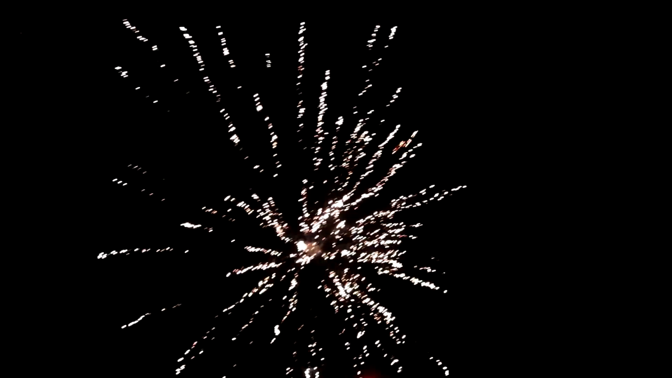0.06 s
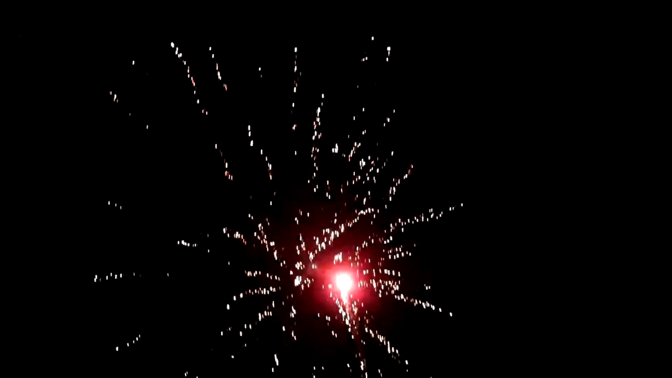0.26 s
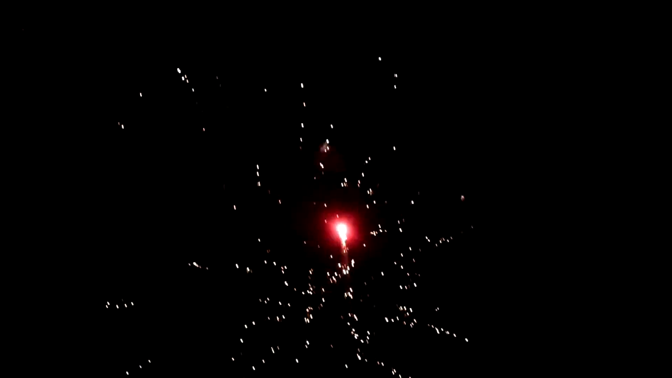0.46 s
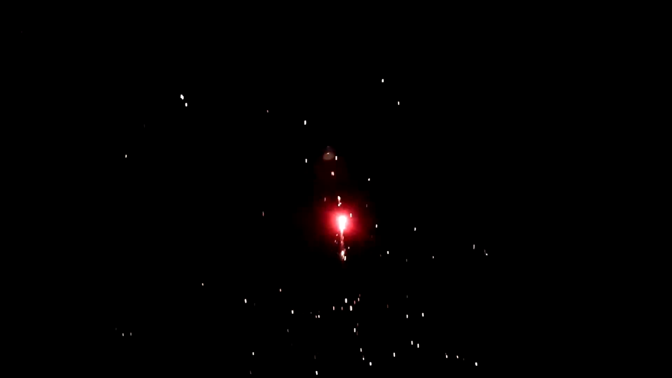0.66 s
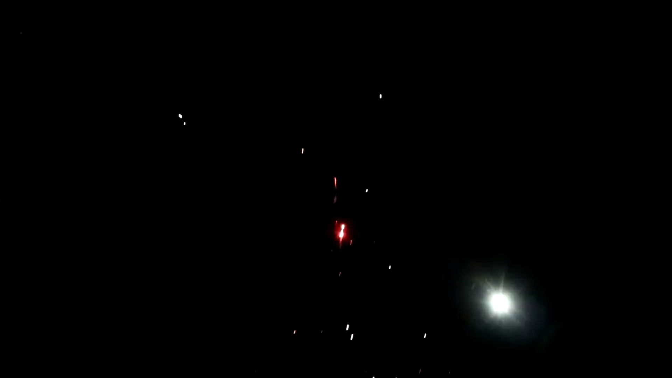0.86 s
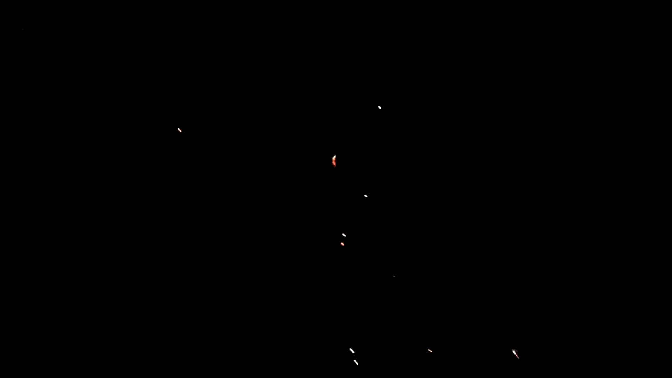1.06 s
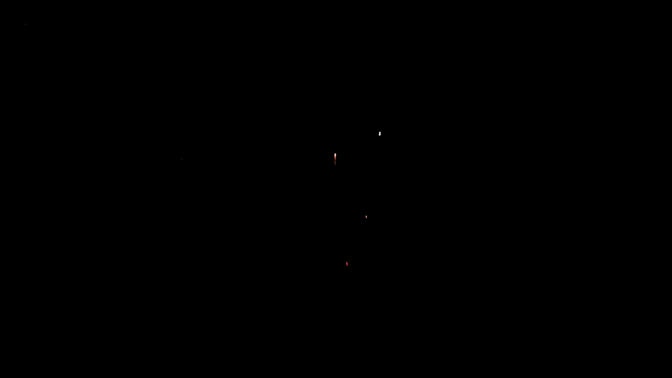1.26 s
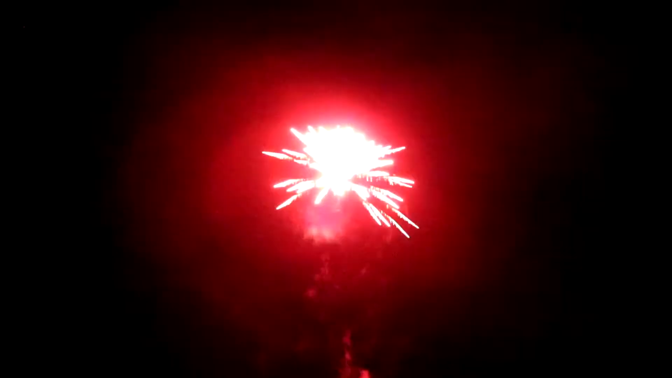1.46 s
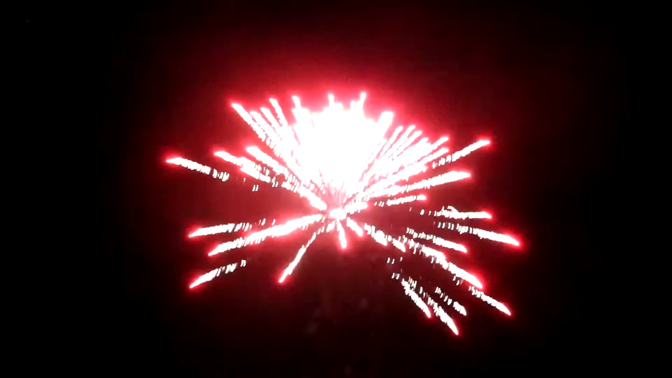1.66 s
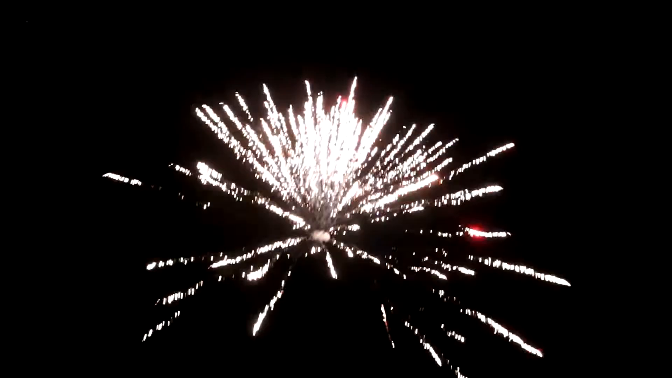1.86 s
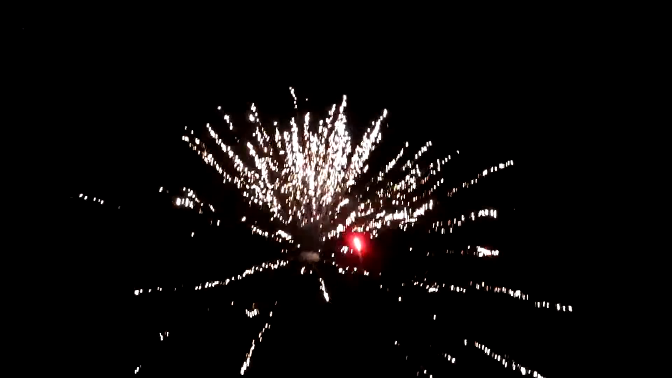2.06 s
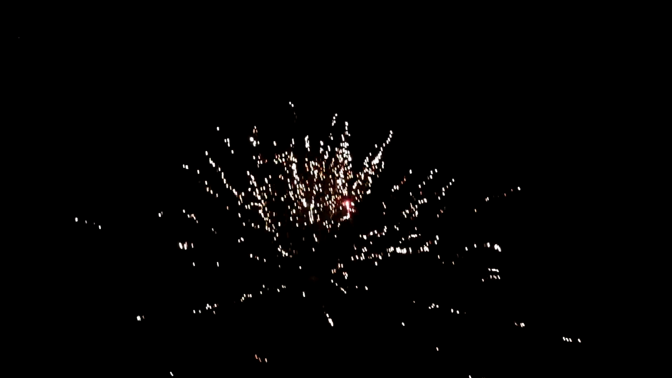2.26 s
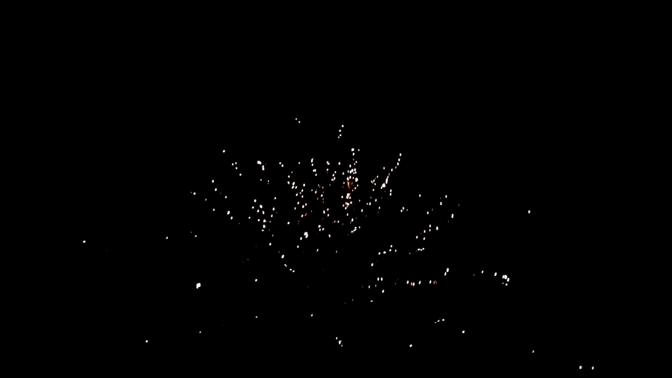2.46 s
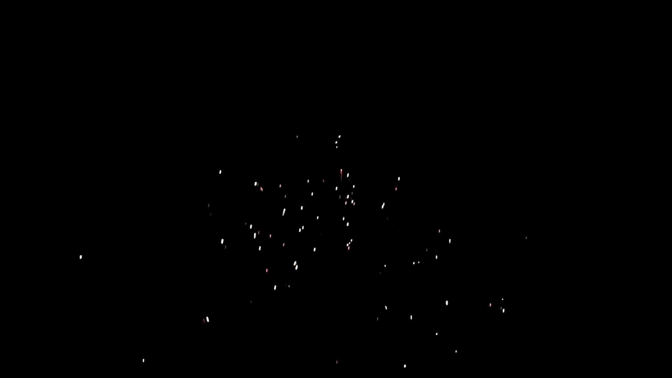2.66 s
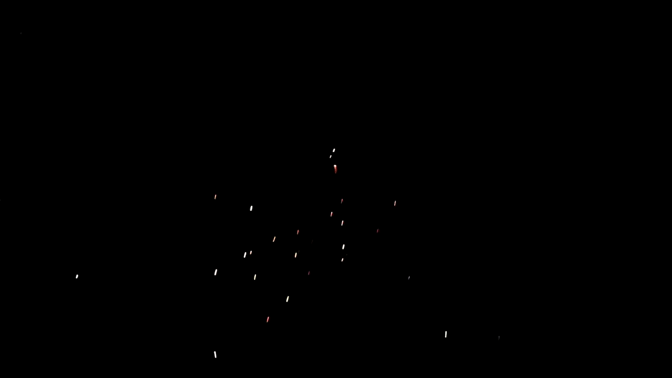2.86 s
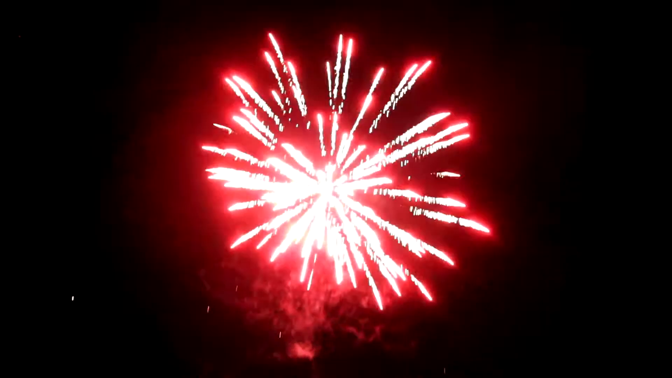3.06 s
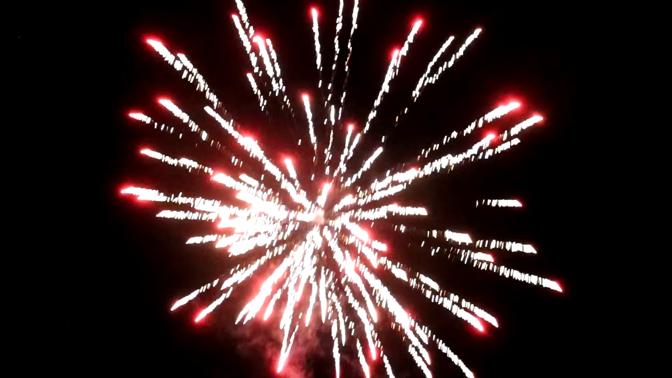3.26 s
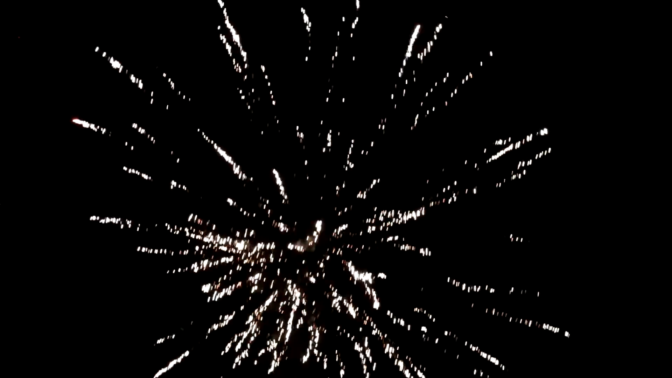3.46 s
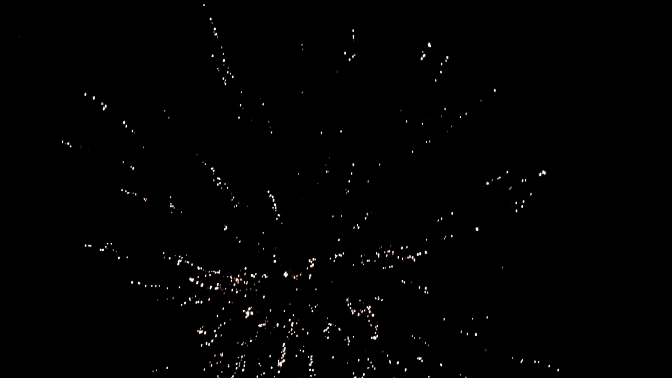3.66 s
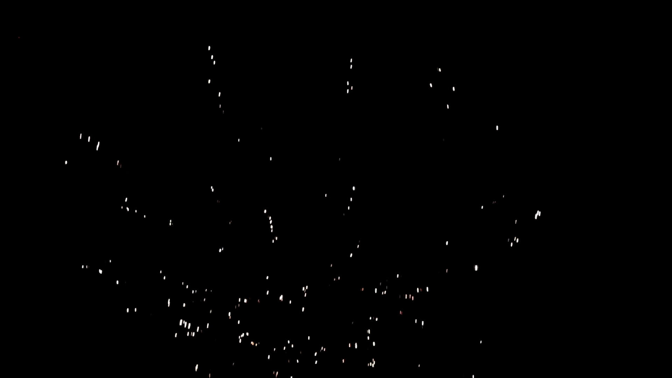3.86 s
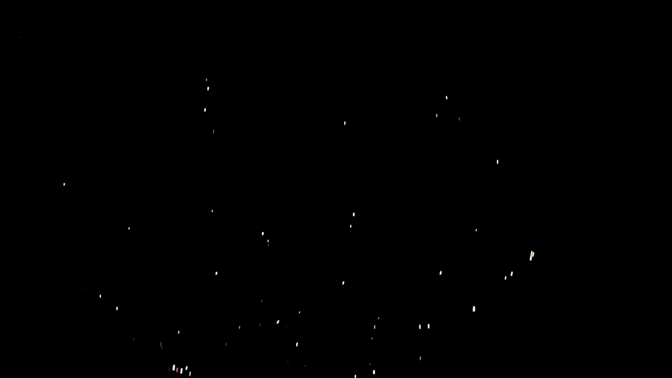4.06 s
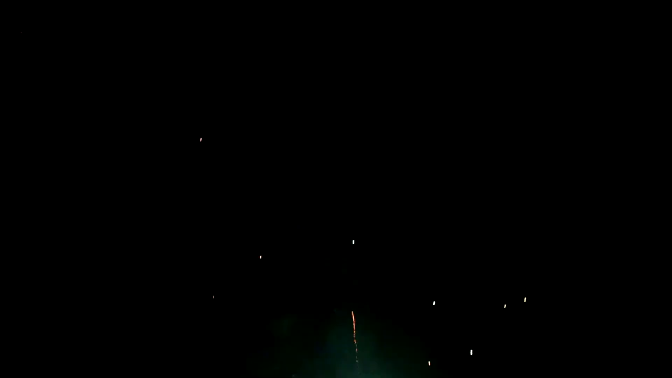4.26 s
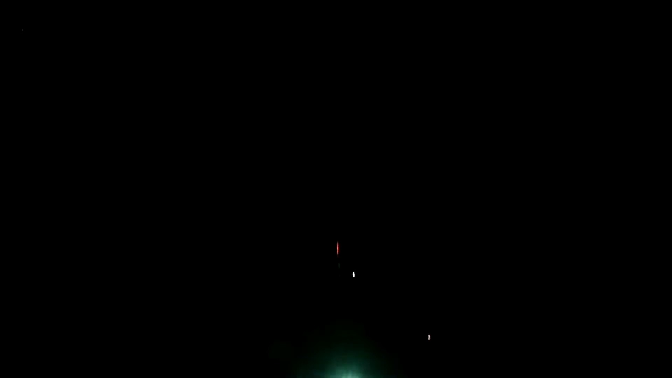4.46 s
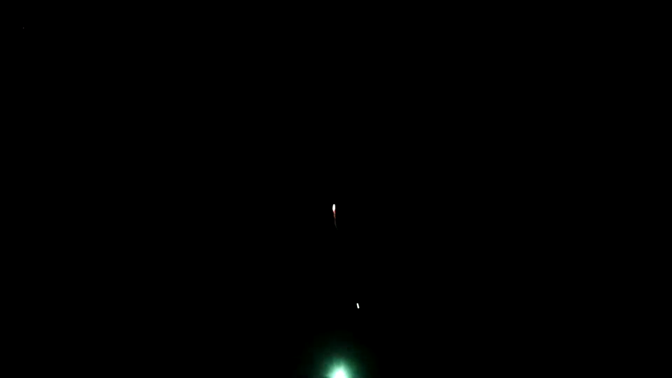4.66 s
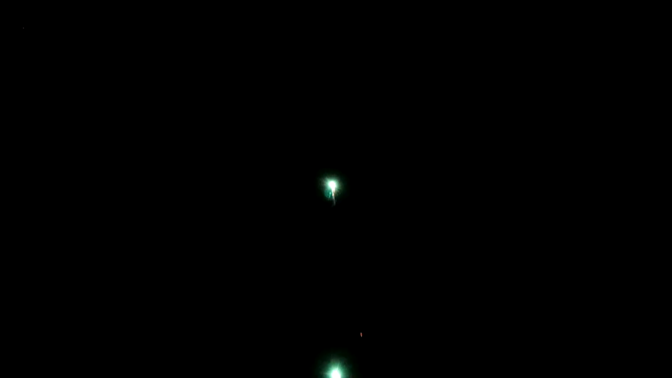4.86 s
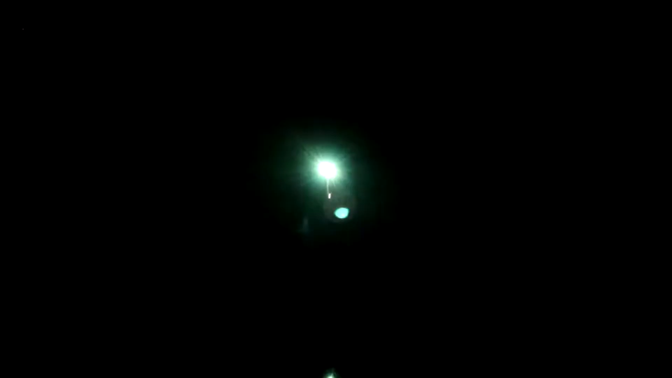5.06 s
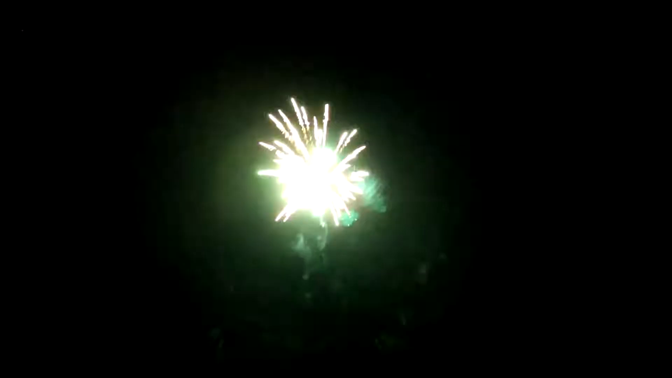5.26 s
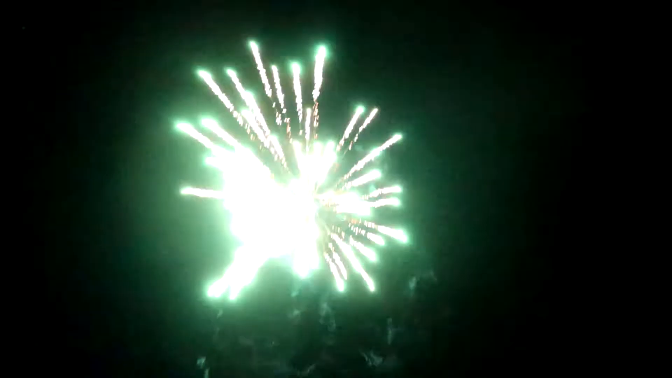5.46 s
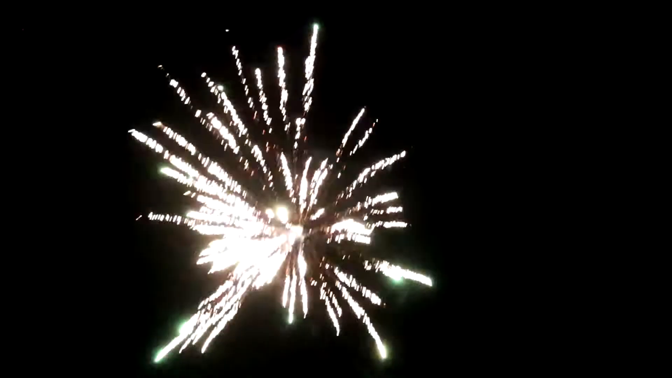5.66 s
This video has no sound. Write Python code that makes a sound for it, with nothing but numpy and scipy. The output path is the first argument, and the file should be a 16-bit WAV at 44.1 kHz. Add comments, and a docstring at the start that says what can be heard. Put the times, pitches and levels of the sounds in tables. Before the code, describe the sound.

Open-air fireworks at night, heard by a small stereo microphone that clips on the nearest bangs. It starts with soft, dull thuds over low rumble, then a dense rattling salvo of muffled thumps with gritty edges at 0.64-0.92 s. Weaker thumps follow until a hard, bright double crack at 1.51-1.55 s, with a swelling echo about 0.17 s later. Thumps at 1.7-1.8 s, scattered far thuds from 2.1 to 2.9 s and faint dry crackles lead to a gritty launch thump at 3.01 s and a loud crack at 3.06 s. Echoing thuds and fine crackle continue to a smaller sharp bang at 3.99 s. A heavy thump at 4.12 s brings deep roar; muffled clusters come at 4.4, 4.64 and 4.85 s, with a tiny snap at 4.9 s. After low thuds, a ringing launch at 5.33 s precedes the strongest bang at 5.36 s, then booming, washy echoes to the end.

```python
"""Outdoors at night, a firework cake fires: near bangs overload a small stereo microphone and bounce off the ground.
Each bang is a slowing pressure swing with a noise crack; echoes return as swells of filtered random pops.
Far shots are dull swings with scattered repeats, over a lumpy rumble, deep roar and wash of random pops.
Launch tubes ring as damped sines; crackling stars are narrow noise bursts, and burning stars hiss faintly."""
import sys
import numpy as np
from scipy import signal
from scipy.fft import rfft, irfft, next_fast_len
from scipy.io import wavfile
from scipy.ndimage import map_coordinates

SR = 44100
rng = np.random.default_rng(int(sys.argv[2]) if len(sys.argv) > 2 else 0)


def wav_out(sig):
    """Save sig, one row per channel (or a flat mono array), as 16-bit PCM at SR to the path in sys.argv[1]."""
    wavfile.write(sys.argv[1], SR, np.round(np.clip(np.atleast_2d(sig).T, -1, 1) * 32767).astype(np.int16))


N = 251811


def amp(db):
    """Amplitude gain of a dB value."""
    return 10 ** (np.asarray(db) / 20)


def power(db):
    """Power of a dB value."""
    return amp(2 * np.asarray(db))


def column(values):
    """One value per row, to broadcast over time."""
    return np.reshape(values, (-1, 1))


def colour(x, points, causal=False):
    """Shape by a (Hz, dB) spectrum; the causal form is minimum-phase, so nothing sounds early."""
    hz, db = np.transpose(points)
    size = 2 * next_fast_len(N // 2 + 1)
    f = np.fft.rfftfreq(size, 1 / SR)
    gain = amp(np.interp(np.log(f + 1), np.log(hz + 1), db))
    if causal:
        cepstrum = irfft(np.log(gain), size)
        cepstrum[1:size // 2] *= 2
        cepstrum[size // 2 + 1:] = 0
        gain = np.exp(rfft(cepstrum))
    return irfft(rfft(x, size) * gain, size)[..., :N]


def dull(x, hz):
    """Air and distance take the treble: third-order low-pass."""
    sos = signal.butter(3, np.clip(hz, 100, 18000), fs=SR, output="sos")
    return signal.sosfilt(sos, x)


def thin(x, hz):
    """First-order bass cut."""
    return signal.lfilter(*signal.butter(1, hz, "high", fs=SR), x)


def add(track, s, sound):
    """Mix a sound in at a time in seconds."""
    i = round(s * SR)
    track[..., i:i + sound.shape[-1]] += sound[..., :N - i]


def blast(slowness, fade_s, bend):
    """A shock front, then ever slower pressure swings as port and capsule settle; slowness stretches it all."""
    t = np.arange(1200) / SR / slowness
    swings = np.sin(np.pi * (4000 * t) ** bend)
    return swings * np.exp(-(t / fade_s) ** 2)


def swell(start, end, rise_db_per_s, fall_db_per_s):
    """Power that rises until start and falls after end; it tops at 1 unless end comes before start."""
    t = np.arange(N) / SR
    drop_db = rise_db_per_s * np.maximum(start - t, 0) + fall_db_per_s * np.maximum(t - end, 0)
    return power(-drop_db)


# Near bangs, some as two close bursts. Each row: start in seconds, blast level in dB, crack level in dB,
# slowness as a ratio, fade in ms at slowness 1, ground echo in dB re blast, bass cut in Hz, treble cut in Hz.
NEAR_BANGS = [(1.5069, -6.5, -34, 0.87, 2.4, -50, 230, 3000), (1.51005, 8, -8, 1.11, 1.47, -53, 900, 16000),
              (1.55324, 6, -9, 1.02, 2.1, -5, 900, 16000), (1.55408, -2.5, -18, 0.37, 2.54, -33, 20, 9000),
              (3.05991, 9, -9, 1.07, 1.8, -8, 460, 16000), (3.06044, 6.5, -14, 1.35, 0.45, -40, 20, 16000),
              (3.98998, 1, -10, 1.93, 1.85, -50, 900, 12000), (3.99113, 3, -6, 0.94, 1.89, -50, 20, 16000),
              (5.35592, 13.5, -5, 1.06, 1.6, -12, 900, 16000)]
GROUND_LAG_S = 0.0095
CRACK_BODY_HZ, CRACK_BODY_DB = 4070, 4.5


def bangs():
    """Blast and ragged noise crack with a short fizz, then a duller bounce off the ground."""
    out = np.zeros((2, N))
    rough = rng.standard_normal((len(NEAR_BANGS), 2, 1200))
    t = np.arange(1200) / SR
    onset = 1 - np.exp(-(t / 0.0003) ** 2)
    for (s, db, crack_db, slowness, fade_ms, echo_db, bass_hz, top_hz), noise in zip(NEAR_BANGS, rough):
        fizz = dull(noise, hz=8100) * np.exp(-t / 0.0039)
        front = thin(blast(slowness, fade_ms / 1000, bend=0.57), bass_hz)
        front = dull(front, top_hz)
        add(out, s, amp(db) * front * [[1], [-0.5]])

        body = signal.lfilter(*signal.iirpeak(CRACK_BODY_HZ, 1.5, fs=SR), noise)
        crack = (noise + amp(CRACK_BODY_DB) * body) * [[1], [0.7]]
        crack = crack * np.exp(-(t / 0.00067) ** 2)
        add(out, s, amp(crack_db) * (crack + amp(-17) * fizz))

        reflected = dull(blast(slowness * 0.8, fade_s=0.0025, bend=0.52), hz=6000)
        bounce = onset * reflected * [[1], [-0.3]] + amp(-21) * fizz
        add(out, s + GROUND_LAG_S, amp(db + echo_db) * bounce)
    return out


TAIL_DB_RE_BLAST = (-46, -21, -44, -52)   # rumble body, rumble edge, wash, hiss
TAIL_FALL_DB_PER_S = 1100


def tail_power():
    """Short decaying tail of each bang: power of rumble body, edge, wash and hiss."""
    t = np.arange(N) / SR
    total = np.zeros((4, N))
    for s, db, *_ in NEAR_BANGS:
        fall = swell(s, s, 0, TAIL_FALL_DB_PER_S) * (t > s)
        total += power(db + column(TAIL_DB_RE_BLAST)) * fall
    return total


# Swells answering near bangs. Each row: bang time in seconds, then top levels in dB of
# rumble edge, wash and hiss.
ECHO_SWELLS = [(-.09, -32, -46, -59.5), (1.549, -30.5, -33.5, -43.5), (3.063, -27, -30.5, -39.5),
               (3.9913, -29.5, -42, -56), (5.354, -25, -29, -37)]
ECHO_LAG_S, ECHO_RISE_DB_PER_S, ECHO_FALL_DB_PER_S = 0.17, 90.5, 109
ECHO_BODY_DB_RE_EDGE = -8.5


def echo_power():
    """The surroundings return each bang as a swell: power of rumble body, edge, wash and hiss."""
    t = np.arange(N) / SR
    total = np.zeros((4, N))
    for s, edge_db, wash_db, hiss_db in ECHO_SWELLS:
        top = s + ECHO_LAG_S
        top_db = column([edge_db + ECHO_BODY_DB_RE_EDGE, edge_db, wash_db, hiss_db])
        shape = swell(top, top, ECHO_RISE_DB_PER_S, ECHO_FALL_DB_PER_S)
        total += power(top_db) * shape * (t > s)
    return total


# Far or reflected shots. Each row: start in seconds, peak of first arrival in dB,
# nominal pitch in Hz, nominal treble limit in Hz (scaled at the filters).
FAR_SHOTS = [(0.0375, -28, 720, 1080), (0.1462, -22, 448, 900), (0.1931, -18.5, 530, 915),
             (.253, -16, 617, 895), (0.2847, -19, 486, 1300), (0.3134, -12.5, 710, 1200),
             (.3621, -24, 526, 1570), (0.64, -9, 500, 1010), (0.65, -11, 372, 1080), (.676, -26, 520, 1000),
             (0.6924, -12.5, 423, 1030), (0.7123, -12.5, 600, 960), (0.723, -14, 520, 980),
             (0.757, -9, 805, 1380), (0.763, -12, 800, 1600), (.7703, -5.5, 840, 1210),
             (0.783, -17, 600, 1200), (.7935, -9, 706, 1200), (0.8068, -15, 494, 1100),
             (0.814, -10, 790, 1190), (0.82, -12.5, 900, 1280), (.8285, -15, 500, 1100),
             (0.8379, -18, 650, 1200), (.851, -18, 497, 1100), (0.8583, -9.5, 776, 1090),
             (.8783, -9, 810, 1080), (0.896, -15, 507, 1130), (0.9113, -17, 516, 895),
             (0.9236, -12.5, 534, 800), (1.035, -17, 497, 940), (1.164, -25, 500, 900),
             (1.184, -26, 520, 900), (1.205, -24.5, 620, 1200), (1.224, -24, 520, 900),
             (1.2415, -18.5, 620, 1000), (1.252, -25, 560, 1290), (1.2761, -13, 550, 1020),
             (1.289, -17, 750, 1250), (1.303, -21, 590, 1300), (1.345, -19.5, 400, 750),
             (1.7174, -14, 580, 2370), (1.749, -23, 596, 1890), (1.7743, -15, 1130, 2350),
             (1.79, -11.5, 646, 1540), (2.062, -23, 580, 1440), (2.19, -17.5, 444, 1150),
             (2.2106, -16, 510, 920), (2.244, -18.5, 420, 784), (2.2729, -21, 624, 875),
             (2.3034, -18.5, 516, 1140), (2.3298, -24, 804, 2630), (2.408, -23.5, 900, 1600),
             (2.4965, -20, 596, 880), (2.541, -16, 910, 1700), (2.565, -18, 554, 1000),
             (2.582, -17, 437, 800), (2.5904, -13.5, 430, 790), (2.6496, -25, 390, 1120),
             (2.694, -25, 600, 1100), (2.713, -18, 600, 930), (2.8054, -22.5, 1150, 1630),
             (2.9508, -20.5, 890, 1520), (3.011, -9, 1070, 1850), (3.173, -26, 610, 2690),
             (3.202, -15, 1280, 2650), (3.2277, -8.5, 633, 1720), (3.2584, -13, 556, 1200),
             (3.2832, -12, 1580, 2130), (3.287, -16.5, 460, 1200), (3.305, -21, 600, 1300),
             (3.362, -19, 696, 1400), (3.437, -22.5, 600, 1200), (3.4668, -18, 417, 970),
             (3.5155, -18.5, 530, 990), (3.573, -18, 600, 1200), (3.628, -27, 700, 1400),
             (3.7013, -22, 620, 1660), (3.7835, -14, 520, 1270), (3.814, -18.5, 650, 1100),
             (3.818, -16, 674, 1200), (3.8423, -18, 700, 1400), (3.848, -19, 600, 1510),
             (4.1207, -5.5, 515, 1210), (4.214, -12.5, 1200, 1680), (4.224, -25, 880, 1540),
             (4.3886, -11.5, 560, 890), (4.396, -18, 420, 700), (4.4018, -16.5, 640, 1090),
             (4.4081, -10.5, 377, 795), (4.416, -14, 380, 650), (4.4258, -18, 600, 1000),
             (4.431, -17, 520, 1000), (4.436, -18, 480, 750), (4.443, -13.5, 553, 900),
             (4.451, -18, 420, 800), (4.464, -24, 900, 1700), (4.551, -20.5, 390, 646),
             (4.587, -26, 400, 700), (4.597, -20, 520, 900), (4.611, -20, 480, 1100),
             (4.626, -15.5, 480, 800), (4.6348, -8, 490, 800), (4.648, -8.5, 450, 1000),
             (4.664, -16, 408, 730), (4.8441, -12, 407, 834), (4.848, -7, 393, 940), (4.8530, -7, 387, 834),
             (4.8571, -3, 434, 730), (4.875, -22, 483, 900), (4.889, -22, 550, 1100),
             (5.1194, -19.5, 452, 800), (5.127, -18, 481, 800), (5.141, -21, 520, 850),
             (5.149, -22, 600, 1000), (5.16, -17.5, 443, 750), (5.1751, -13.5, 410, 696),
             (5.1924, -17, 550, 900), (5.2091, -16, 420, 650), (5.220, -24, 400, 700),
             (5.247, -23, 450, 900), (5.3314, -9.5, 567, 1510), (5.4577, -16, 395, 1000),
             (5.464, -12, 546, 1000), (5.468, -15, 620, 1260), (5.4915, -18, 700, 1500),
             (5.5214, -8.5, 1320, 2630), (5.5304, -19, 560, 2300), (5.5797, -23, 650, 2417)]
SCATTER_MS = 6.3   # e-fold of the repeats


def thuds():
    """Each dull shot comes with a few weaker, uneven repeats off walls and trees."""
    out = np.zeros((2, N))
    lags = rng.random((len(FAR_SHOTS), 4))
    sides = rng.standard_normal((len(FAR_SHOTS), 5))
    signs = rng.choice([-1, 1], (len(FAR_SHOTS), 5))
    for (s, db, hz, top_hz), lag, side, sign in zip(FAR_SHOTS, lags, sides, signs):
        wave = dull(blast(slowness=680 / hz, fade_s=0.0021, bend=0.5655), 1.68 * top_hz)
        wave = dull(wave, 2.38 * top_hz)
        wave = amp(db) * wave / np.abs(wave).max()
        delays_ms = np.r_[0, np.cumsum(1.5 + 3.5 * lag)]
        gains = np.where(delays_ms > 0, 0.7, 1) * np.exp(-delays_ms / SCATTER_MS)
        gains = gains * np.r_[1, sign[1:]]
        for delay_ms, gain, pan in zip(delays_ms, gains, side):
            add(out, s + delay_ms / 1000, gain * wave * [[1], [pan]])
    return out


def grit_bursts(table):
    """Spiky noise in a narrow band, rising 30 dB over the build-up and falling 60 dB over t60."""
    out = np.zeros((2, N))
    spikes = rng.exponential(1, (len(table), 1, 6000)) ** 1.4
    noise = rng.standard_normal((len(table), 2, 6000)) * spikes
    t = (np.arange(6000) - 2000) / SR
    for (s, db, hz, build_s, t60_s), grit in zip(table, noise):
        band = signal.butter(3, [hz / 1.25, hz * 1.3], "band", fs=SR, output="sos")
        drop_db = 60 * np.maximum(t / t60_s, -t / build_s / 2)
        add(out, s + t[0], amp(db - 3.5 - drop_db) * signal.sosfilt(band, grit))
    return out


# Each row: peak time in seconds, level in dB before a common trim, centre in Hz,
# build-up in seconds, t60 in seconds.
THUD_GRIT = [(.6403, -29, 1750, .002, .057), (.771, -16, 1700, .003, .05), (.818, -16, 1500, .02, 0.048),
             (.695, -26, 1710, .01, 0.043), (.797, -22, 1800, .02, .05), (.84, -23, 1680, .02, 0.044),
             (.912, -28.5, 1900, .003, 0.027), (.875, -18, 1690, 0.041, 0.052),
             (1.7184, -15, 1900, .002, 0.027), (1.7894, -16, 1780, .002, 0.067),
             (2.306, -29, 2200, .005, .04), (2.331, -22, 2100, .002, .05), (3.0118, -4, 1500, .002, 0.052),
             (3.012, -14.5, 2300, 0.0019, 0.036), (3.2275, -10, 1610, .002, 0.057),
             (3.2864, -15, 1750, .005, 0.071), (4.1216, -12, 1700, 0.0017, 0.036),
             (4.2145, -36, 1960, 0.0018, .03), (4.41, -30, 1100, 0.027, 0.11),
             (4.64, -33, 1000, 0.033, 0.073), (4.853, -6.5, 990, 0.016, 0.048),
             (5.3324, -6.5, 1310, 0.0014, 0.076), (5.5228, -9.5, 1810, 0.0056, 0.046)]


def thud_grit():
    """Gritty edge of the brightest thuds, as noise bursts."""
    return grit_bursts(THUD_GRIT)


# Each row: start in seconds, level in dB before the onset ramp, ring in Hz, t60 in seconds.
TUBE_RINGS = [(3.0109, -11, 359, 0.025), (4.1212, -18, 424, 0.017), (5.3315, -14.5, 304, 0.023)]


def tubes():
    """Launch tubes ring low as they fire: a damped sine each."""
    out = np.zeros((2, N))
    t = np.arange(3000) / SR
    onset = 1 - np.exp(-(t / 0.00052) ** 2)
    for s, db, hz, t60_s in TUBE_RINGS:
        ring = amp(db - 60 * (t / t60_s) ** 2) * np.sin(2 * np.pi * hz * t)
        add(out, s, ring * onset * [[1], [0.3]])
    return out


# Each row: start in seconds, level in dB before a common trim.
STAR_POPS = [(4.906, -20)]


def snap():
    """A small star pops: a thin bright click of differenced, decaying noise."""
    out = np.zeros((2, N))
    for s, db in STAR_POPS:
        bright = np.diff(rng.standard_normal((2, 400)))
        burst = bright * np.exp(-np.arange(399) / SR / 0.0016)
        add(out, s + 0.0016, amp(db - 12) * burst)
    return out


# Each row: peak time in seconds, level in dB before a common trim, centre in Hz,
# build-up in seconds, t60 in seconds.
STAR_CRACKLES = [(.384, -42, 3260, .01, .1), (.763, -28, 3200, .01, 0.044), (.771, -38, 4700, .002, 0.019),
                 (.875, -35, 2980, 0.024, 0.071), (.88, -44, 4650, 0.0017, 0.014),
                 (1.7185, -22, 4620, .002, .02), (2.206, -39, 3860, .005, 0.15),
                 (2.330, -30.5, 3460, .002, .06), (2.358, -37.5, 3800, 0.018, .07),
                 (2.543, -36, 3300, 0.011, 0.11), (3.545, -34, 3380, 0.14, .1),
                 (3.68, -36, 3440, 0.11, 0.045), (3.735, -29.5, 3870, .06, 0.075),
                 (3.88, -36, 3530, 0.13, .05), (3.921, -36, 3230, .004, 0.061),
                 (4.06, -33, 5160, 0.031, 0.16), (4.185, -35, 3530, .05, .12), (5.185, -38, 3300, .01, .07),
                 (.365, -58, 6500, .02, .15), (.548, -65, 8100, .01, .13), (.762, -53, 8000, .01, .054),
                 (1.15, -66.5, 7500, .05, .3), (2.635, -60, 8000, .05, 0.22), (3.93, -61, 9500, 0.047, .06),
                 (4.06, -45, 10200, 0.056, 0.17), (5.165, -52, 7000, .05, 0.22)]


def crackles():
    """Puffs of crackling stars build up and die, each a band of grit."""
    return grit_bursts(STAR_CRACKLES)


# Far salvos. Each row: end of rise in seconds, start of fall in seconds, rise in dB per s, fall in dB per s,
# then levels in dB of roar, rumble body, rumble edge and wash.
SALVO_ROLLS = [(0.026, 0.097, 606, 152, -42, -30.5, -27.5, -65),
               (0.2, 0.19, 902, 300, -54, -38, -46, -61.5), (0.236, 0.31, 302, 400, -53, -31.5, -28, -56),
               (0.36, 0.35, 902, 406.5, -41.5, -31, -39, -44), (0.545, 0.55, 300, 202, -51, -44, -31, -63),
               (0.645, 0.69, 2004, 506, -40.5, -30, -20, -55),
               (.757, 0.769, 609, 301, -35, -22, -10.5, -40),
               (0.785, 0.901, 405, 453, -48, -24.5, -14.5, -49),
               (0.979, 0.99, 606, 402, -47, -34.5, -30.5, -56), (1.038, 1.04, 904, 702, -41, -30, -25, -66),
               (1.169, 1.3, 902, 600, -48, -32.5, -33, -71),
               (1.345, 1.34, 2998, 1202, -42, -28.5, -33, -65), (2.003, 2.08, 200, 300, -71, -44, -32, -46),
               (2.15, 2.21, 295, 106, -42, -31.5, -37, -67), (2.557, 2.555, 297, 250, -33, -35, -23, -48),
               (2.648, 2.58, 600, 397, -44, -27, -41, -64), (2.717, 2.75, 400, 346, -44.5, -42, -29, -61),
               (2.89, 2.9, 200, 300, -48, -43, -33, -64), (3.01, 3.08, 4000, 1498, -55, -33.5, -24, -44),
               (3.488, 3.55, 202, 198, -58, -48, -27, -43.5), (3.785, 4, 898, 204, -61, -41, -34, -47.5),
               (3.935, 4, 405, 900, -46.5, -34.5, -26.5, -44.5),
               (4.052, 4.05, 1206, 183, -46, -33, -23.5, -38),
               (4.118, 4.044, 2000, 400, -47, -27, -36, -16), (4.182, 4.2, 300, 200, -45, -50, -31, -40.5),
               (4.391, 4.53, 1998, 600, -40, -33.5, -33, -64),
               (4.525, 4.61, 297, 300, -40, -35.5, -31.5, -52),
               (4.634, 4.662, 300, 500, -32, -27.5, -26.5, -52),
               (4.764, 4.78, 195, 348.5, -41, -29, -27.5, -51),
               (4.855, 4.87, 1300, 604, -25, -13.5, -18, -51), (4.91, 4.89, 597, 593, -44, -17, -33, -58),
               (5.121, 5.15, 898, 600, -37, -28.5, -30, -45), (5.282, 5.3, 250, 452, -53, -36.5, -34, -47),
               (5.334, 5.35, 3000, 900, -51, -22, -21, -34), (5.465, 5.39, 900, 400, -18, -4, -21, -45),
               (5.5, 5.55, 298, 245, -36, -24, -28, -36.5)]


def roll_power():
    """Far salvos roll in and die away: power of roar, rumble body, edge and wash."""
    total = np.zeros((4, N))
    for start, end, rise, fall, *top_db in SALVO_ROLLS:
        total += power(column(top_db)) * swell(start, end, rise, fall)
    return total


# Far firing, interpolated. Each row: time in seconds, then levels in dB before the dips of
# roar, rumble body, wash and hiss.
FAR_FIRING = [(0.0, -54, -45, -58, -66), (0.4, -62, -47.5, -50.5, -70.5), (0.6, -49, -38.5, -50.5, -73),
              (0.8, -41.5, -28, -61, -85), (1.07, -50, -51, -55.5, -80), (1.16, -46.5, -44.5, -57, -87),
              (1.49, -50.5, -46.5, -62.5, -74), (1.9, -65, -43, -48, -58.5), (2.2, -48, -44, -48, -64),
              (2.6, -48, -37.5, -45.5, -67), (2.95, -52, -49.5, -46, -86.5), (3.0, -59, -47, -50, -73),
              (3.4, -45, -41.5, -43, -51.5), (3.6, -55, -40, -43, -56), (3.7, -50, -42, -42, -87),
              (3.97, -45, -46, -41.5, -79), (4.2, -16.5, -33.5, -46.5, -55), (4.5, -36, -40, -50.5, -59.5),
              (5.0, -46, -42, -53, -66.5), (5.301, -44, -50, -48, -69.5), (5.71, -28.5, -51, -40.5, -57)]
EDGE_DB_RE_BODY = 3.5
# roar, rumble body, rumble edge, wash, hiss
DIP_DB = (-38.5, -19.5, -19, -16.5, 0)
DIP_RECOVERS_DB_PER_S = (68, 70.6, 70, 79.6, 80)


def background_power():
    """Steady far firing that sinks after each bang in ECHO_SWELLS, then recovers: power of all five layers."""
    t = np.arange(N) / SR
    s, roar_db, body_db, wash_db, hiss_db = np.transpose(FAR_FIRING)
    rows = (roar_db, body_db, body_db + EDGE_DB_RE_BODY, wash_db, hiss_db)
    level_db = np.array([np.interp(t, s, row) for row in rows])
    for bang_s, *_ in ECHO_SWELLS:
        dip_db = column(DIP_DB) + column(DIP_RECOVERS_DB_PER_S) * (t - bang_s)
        level_db = level_db + (t > bang_s) * np.minimum(dip_db, 0)
    return power(level_db)


def bed_gains():
    """Amplitudes of roar, rumble body, edge, wash and hiss from the summed powers."""
    total = background_power()
    total[:-1] += roll_power()
    total[1:] += echo_power() + tail_power()
    return np.sqrt(total)


def grains(per_s, spread_db, spectrum, low_hz, high_hz):
    """Random pops of uneven size and side; mid and side rows, scaled to mid rms 1 in the named band."""
    size = amp(spread_db * np.minimum(rng.exponential(1, N), 4))
    pops = size * rng.choice([-1, 1], N) * (rng.random(N) < per_s / SR)
    mid_side = colour(np.array([pops, pops * rng.standard_normal(N)]), spectrum)
    sos = signal.butter(4, [low_hz, high_hz], "band", fs=SR, output="sos")
    return mid_side / signal.sosfilt(sos, mid_side[0]).std()


def flicker(per_s):
    """Smooth random curve through normal knots of spread 1."""
    knots = rng.standard_normal(400)
    return map_coordinates(knots, [np.arange(N) / SR * per_s], order=3)


# Each row: frequency in Hz, relative density in dB per Hz.
RUMBLE_SPECTRUM = [(47, -43.5), (80, -16.5), (310, 0.5), (543, -2), (868, -12.5), (1920, -27.5),
                   (2660, -67), (3550, -46.5), (6000, -77), (7800, -87.5), (13200, -120)]


def rumble(body_gain, edge_gain):
    """Lumpy far rumble of pops; nearer salvos keep more of the edge above the body."""
    pops = grains(per_s=900, spread_db=3, spectrum=RUMBLE_SPECTRUM, low_hz=188, high_hz=1020)
    # forward then backward, so the delays largely cancel
    body = dull(dull(pops, hz=724)[:, ::-1], hz=690)[:, ::-1]
    return body_gain * body + edge_gain * (pops - body)


# Each row: frequency in Hz, relative density in dB per Hz.
ROAR_SPECTRUM = [(18, -24.5), (30, -14.5), (60, -0.5), (120, 8.5), (200, 12.5), (400, -42)]


def roar(gain):
    """Deep roar of overlapping low pops."""
    return gain * grains(per_s=820, spread_db=1, spectrum=ROAR_SPECTRUM, low_hz=39.8, high_hz=183)


# Each row: frequency in Hz, relative density in dB per Hz.
WASH_SPECTRUM = [(88, -36), (150, -37), (194, -41), (378, -10), (533, 5), (846, -6.5), (1110, 0),
                 (2450, -7.5), (9000, -45.5), (11700, -100), (19800, -120)]


def wash(gain):
    """Echo wash of pops with a flickering level."""
    level = gain * amp(2.13 * flicker(per_s=45))
    return level * grains(per_s=1900, spread_db=2, spectrum=WASH_SPECTRUM, low_hz=1716, high_hz=5000)


# Each row: frequency in Hz, relative density in dB per Hz.
HISS_SPECTRUM = [(2300, 14), (4000, 15.5), (6700, 6.5), (11500, 3), (12300, 13.5), (13000, -52),
                 (16000, -85)]


def hiss(gain):
    """Burning stars hiss: dense bright pops with a flickering level."""
    level = gain * amp(2.1 * flicker(per_s=14))
    return level * grains(per_s=17000, spread_db=4, spectrum=HISS_SPECTRUM, low_hz=5300, high_hz=13100)


# Two close ports, widened. Each row: frequency in Hz, side gain in dB.
PORT_WIDTH = [(60, -26), (200, -46), (400, -37), (700, -23), (1300, -13.5), (2400, -1.5), (4400, 5),
              (8000, 6.5), (15000, 8)]
FAR_CUT_HZ = 13200


def scene():
    """Sum mid and side, then spread them over two ports."""
    roar_gain, body_gain, edge_gain, wash_gain, hiss_gain = bed_gains()
    far = thuds() + thud_grit() + tubes() + crackles()
    far = far + rumble(body_gain, edge_gain) + roar(roar_gain) + wash(wash_gain) + hiss(hiss_gain)
    far = signal.sosfilt(signal.cheby2(8, 50, FAR_CUT_HZ, fs=SR, output="sos"), far)
    mid, side = far + bangs() + snap()
    side = colour(side, PORT_WIDTH, causal=True)
    return np.array([mid + side, mid - side])


BASS_CUT_HZ, NARROW_BELOW_HZ, TOP_CUT_HZ = 40, 85, 16900
CLIP_LEVEL = 0.86


def record(dry):
    """The bass is thinned, peaks clip hard, the bass is narrowed, the top is cut."""
    thinned = signal.sosfilt(signal.butter(1, BASS_CUT_HZ, "high", fs=SR, output="sos"), dry)
    left, right = thinned / (1 + np.abs(thinned / CLIP_LEVEL) ** 6) ** (1 / 6)
    side = thin((left - right) / 2, NARROW_BELOW_HZ)
    pair = (left + right) / 2 + side * [[1], [-1]]
    return signal.sosfilt(signal.cheby2(16, 110, TOP_CUT_HZ, fs=SR, output="sos"), pair)


dry = scene()
out = record(dry)
wav_out(out)
```